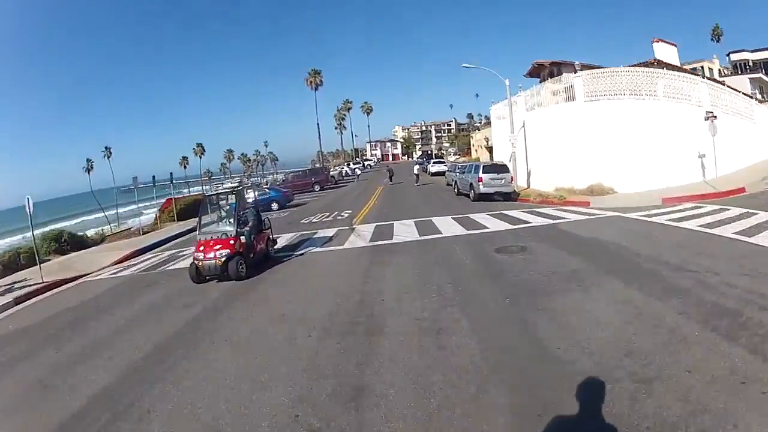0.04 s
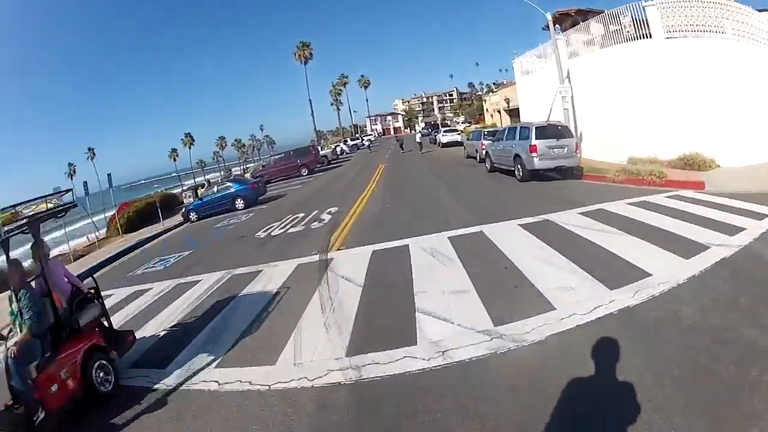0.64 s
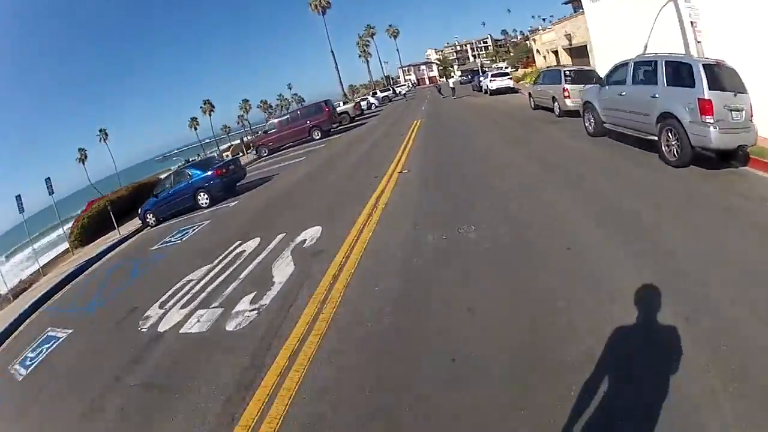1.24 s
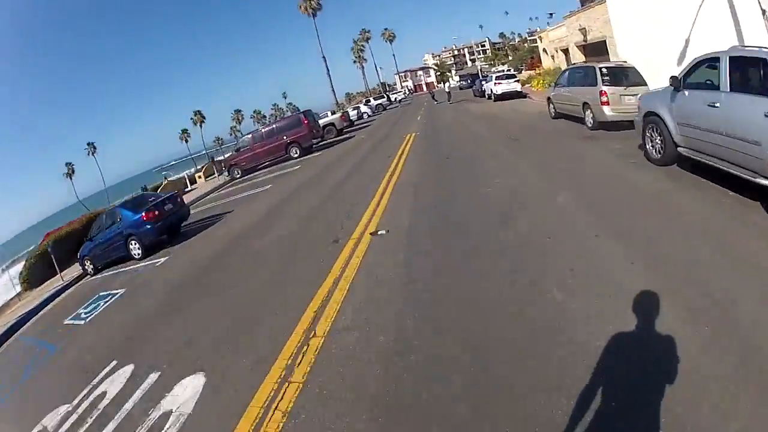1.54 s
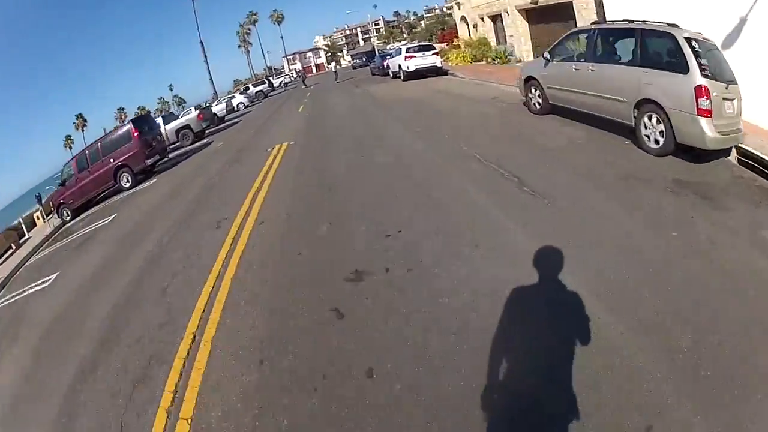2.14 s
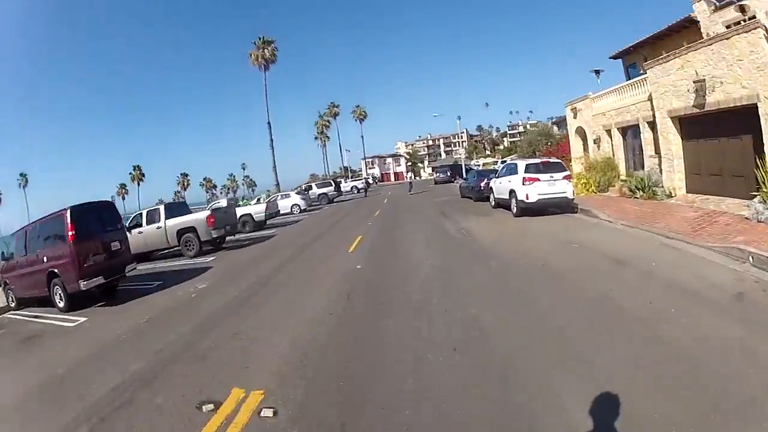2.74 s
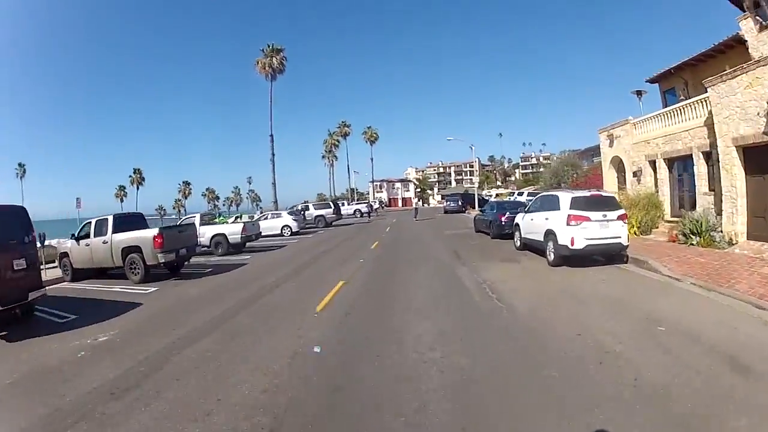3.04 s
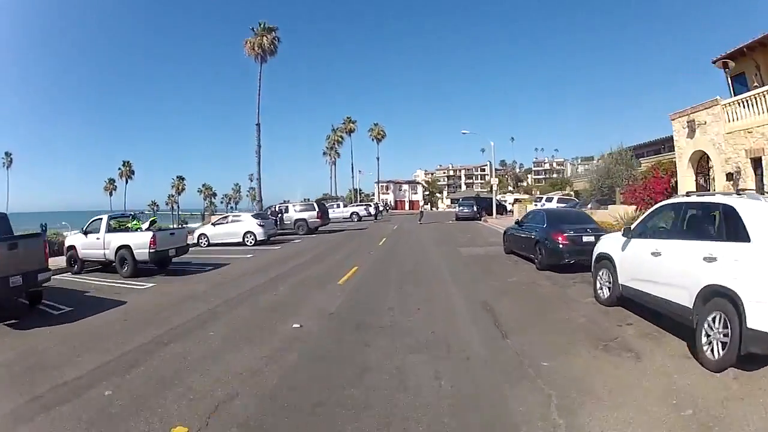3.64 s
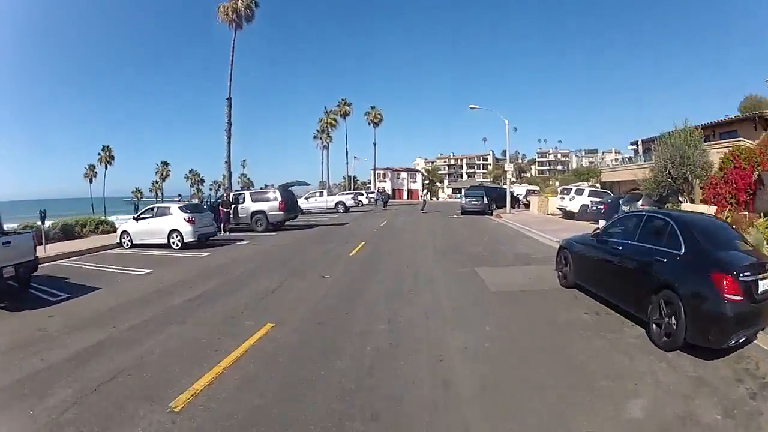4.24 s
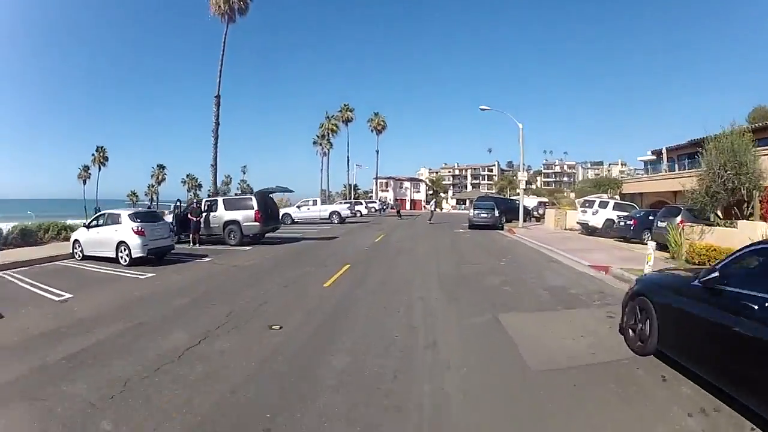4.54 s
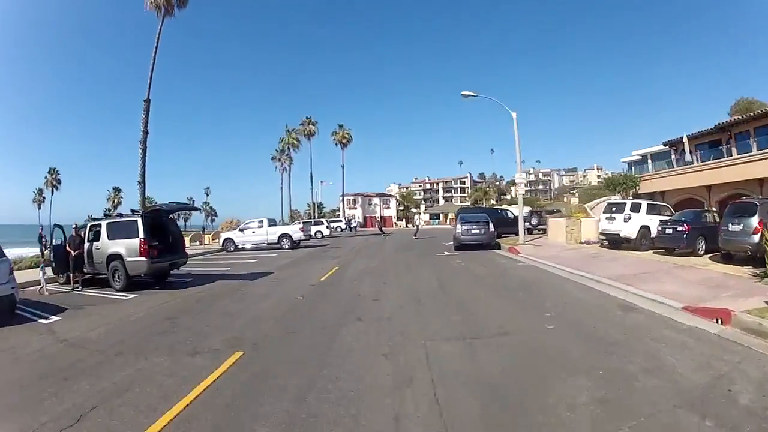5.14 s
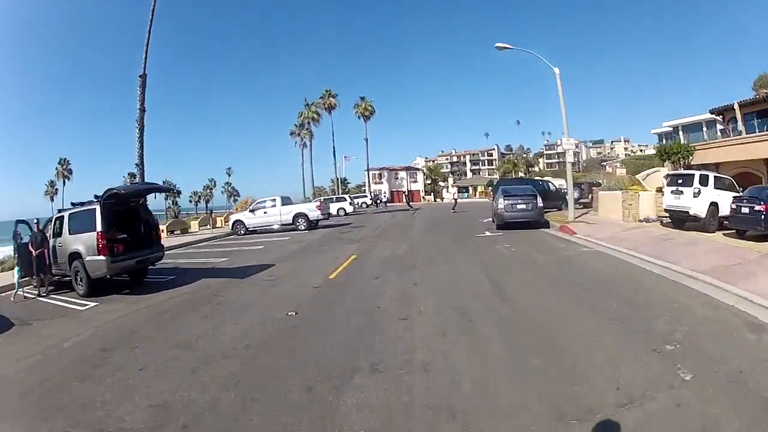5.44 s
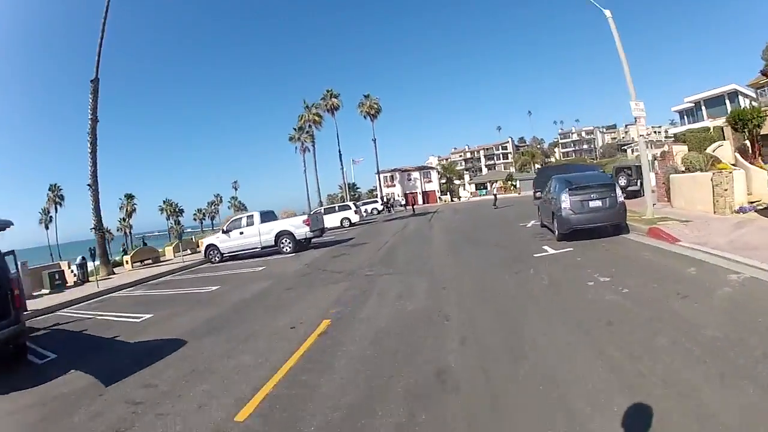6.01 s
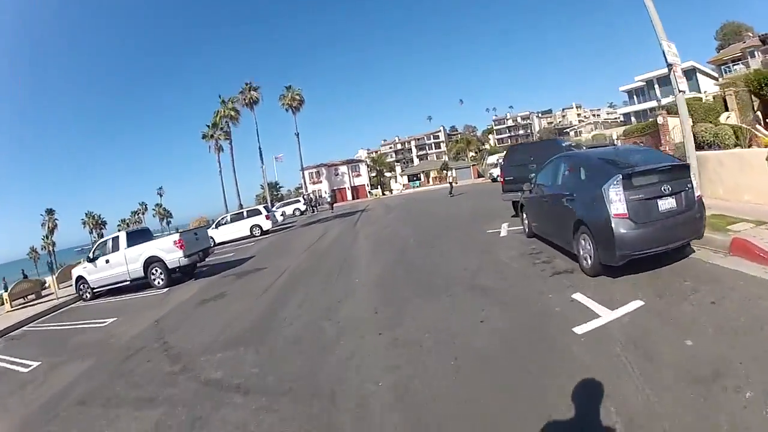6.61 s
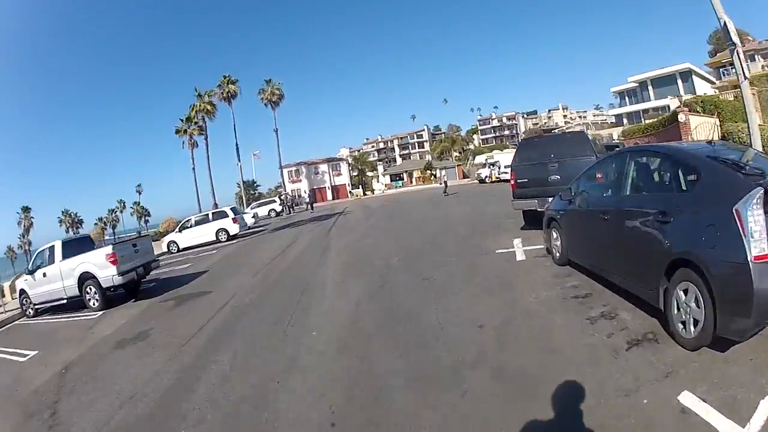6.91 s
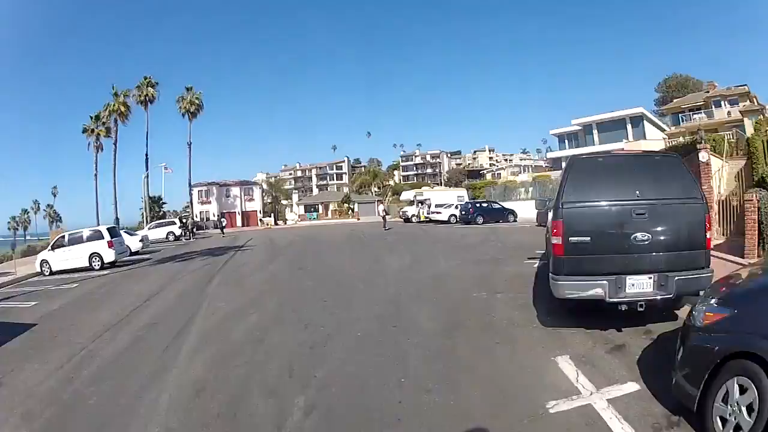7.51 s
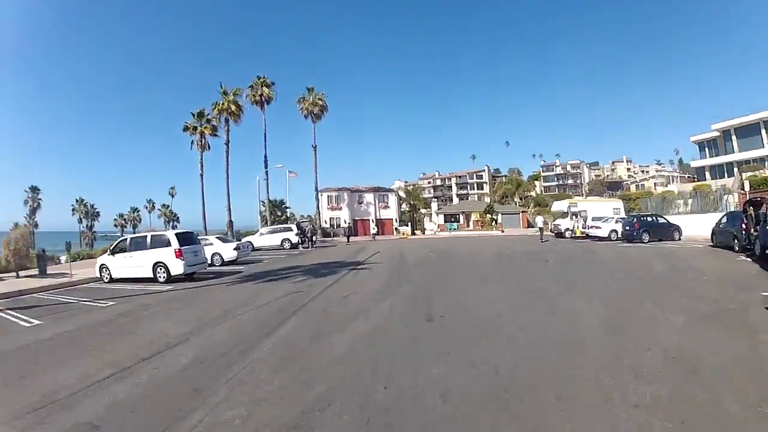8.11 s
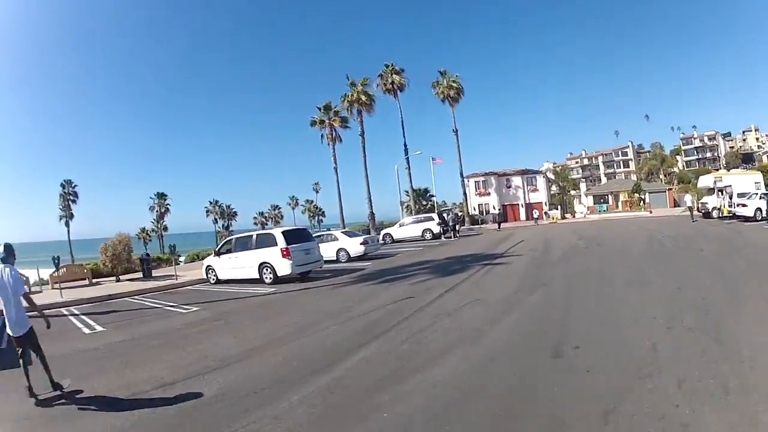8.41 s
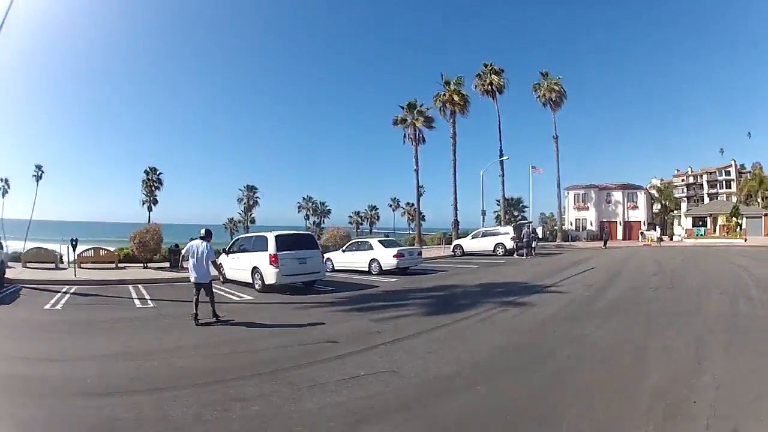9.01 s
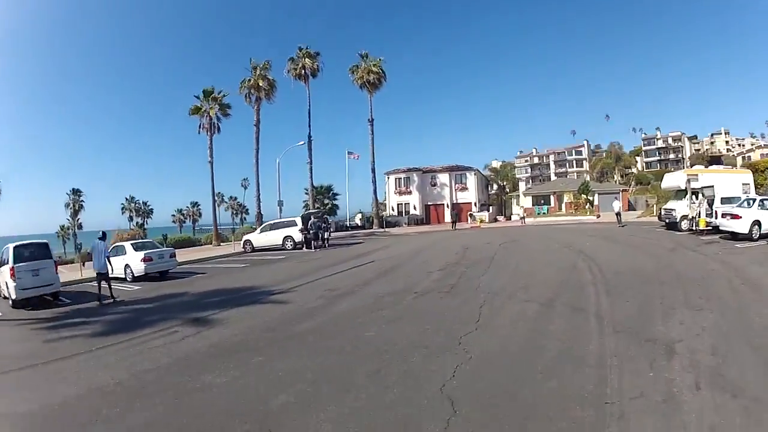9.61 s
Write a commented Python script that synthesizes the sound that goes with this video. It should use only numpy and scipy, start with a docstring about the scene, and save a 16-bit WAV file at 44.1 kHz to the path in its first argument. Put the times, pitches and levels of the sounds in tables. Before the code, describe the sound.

A skateboard rolls fast over asphalt, its wheels droning under heavy, gusting wind that buffets the microphone.

```python
"""A skateboard runs fast down an asphalt street, heard from a small camera that the rider holds.
Road grain drums through the wheels into the resonant deck, the tread rasps, seams knock,
and a parked car reflects the wheels' hiss. Wind buffets the microphone and tears across its port
in gusts. The camera holds each sample at a low rate, mirroring the sound into a thin treble sizzle."""
import sys
import numpy as np
from scipy import signal
from scipy.fft import rfft, irfft
from scipy.io import wavfile
from scipy.ndimage import uniform_filter1d

SR = 44100
rng = np.random.default_rng(int(sys.argv[2]) if len(sys.argv) > 2 else 0)


def master(y):
    """Save y as 16-bit WAV."""
    cut = np.clip(np.atleast_2d(y).T, -1, 1)
    pcm = np.round(cut * 32767)  # scale
    wavfile.write(sys.argv[1], SR, pcm.astype(np.int16))


N = 430416
TIME = np.arange(N) / SR
BIN_HZ = np.fft.rfftfreq(N, 1 / SR)
DULLING = 0.36  # extra spectral fall in dB per kHz for each dB that the air stream loses


def gain_of(db):
    """Decibels to amplitude ratio."""
    return 10 ** (np.asarray(db) / 20)


def unit_rms(x):
    """Normalisation to rms 1."""
    return x / np.sqrt(np.mean(x ** 2) + 1e-20)


def unit_band_rms(x, lo_hz, hi_hz):
    """Normalisation of one band to rms 1, by Parseval's theorem."""
    band = rfft(x)[(BIN_HZ > lo_hz) & (BIN_HZ < hi_hz)]
    return x / np.sqrt(2 * np.sum(abs(band) ** 2) / N ** 2)


def curve(rows, t=TIME, column=1):
    """Linear interpolation of one table column at the times t."""
    rows = np.asarray(rows)
    return np.interp(t, rows[:, 0], rows[:, column])


def coloured(x, spectrum):
    """Filtering by a gain curve in dB, interpolated over log frequency."""
    hz, db = np.transpose(spectrum)
    gain_db = np.interp(np.log(BIN_HZ + 1), np.log(hz + 1), db)
    return irfft(rfft(x) * gain_of(gain_db), N)


def add(mix, start_s, sound):
    """Superposition of a sound on the mix."""
    part = mix[max(round(start_s * SR), 0):][:len(sound)]
    part += sound[:len(part)]


def wander(lo_hz, hi_hz):
    """Pink drift of rms 1: equal power per octave between two rates."""
    hz = BIN_HZ + 1e-3
    shape = 1 / np.sqrt(hz * (1 + (lo_hz / hz) ** 4) * (1 + (hz / hi_hz) ** 4))
    return unit_rms(irfft(rfft(rng.standard_normal(N)) * shape, N))


def swells(rows, steepness):
    """Amplitude envelope of rounded swells; incoherent sounds add in power."""
    return np.sqrt(sum(gain_of(db) ** 2 / (1 + abs(2 * (TIME - middle) / length) ** steepness) ** 2
                       for middle, length, db in rows))


def resonate(force, modes, size=4096):
    """Forced vibration: convolution with the minimum-phase response of damped modes."""
    hz = abs(np.fft.fftfreq(size, 1 / SR))
    power = sum(gain_of(db) ** 2 / (1 + (2 * (hz - f) / width) ** 2) ** 2 for f, width, db in modes)
    log_gain = .5 * np.log(power + 1e-12)
    response = np.fft.ifft(np.exp(np.conj(signal.hilbert(log_gain)))).real[:size // 2]
    return signal.oaconvolve(force, response)[:N]


def buffeting():
    """Turbulent pressure of the headwind rumbles on the microphone; larger eddies sound deeper."""
    # pressure spectrum: frequency_hz, density_db
    spectrum = [(10, -26), (25, -13), (50, -5), (95, -2.5), (160, -1), (240, -1), (350, -1.5), (520, -10),
                (800, -14.5), (1400, -31), (3000, -57)]
    # steady wind: time_s, level_db, deep_lift_db
    headwind = [(0, -23, -1), (1.1, -23.5, 1), (2.4, -27, -2), (2.95, -25, -2), (3.7, -19.5, -2),
                (4.2, -19.5, 9), (4.4, -25, 6), (5.0, -23.5, 3.5), (5.75, -17.5, -3), (5.95, -25, 0),
                (6.35, -29, -1), (6.65, -20, 1), (7.25, -26, 5), (8.0, -19, 0.5), (8.3, -25, 1.5),
                (9.3, -22.5, -3), (9.5, -25.5, -12), (9.76, -21.5, -13)]
    # surges on top of it: middle_s, length_s, level_db
    surges = [(0.355, 0.2, -16.5), (0.6, .04, -18), (1.09, 0.12, -22.5), (3.0, 0.21, -16.5),
              (3.3, .05, -18), (3.41, 0.037, -34), (3.55, 0.13, -15.5), (3.96, 0.086, -17),
              (4.48, 0.035, -17), (4.62, 0.13, -18), (5.24, 0.058, -14.5), (5.54, .1, -20),
              (5.83, 0.05, -16.5), (6.17, .04, -21), (6.55, 0.076, -15.5), (6.99, .05, -17.5),
              (7.16, 0.064, -14.5), (7.42, 0.1, -15), (7.72, 0.6, -18.5), (8.0, 0.13, -26),
              (8.7, 0.066, -24), (8.975, .04, -20), (9.045, 0.044, -16), (9.34, .12, -16.5)]
    lumps = rng.standard_normal(N) * gain_of(1.8 * wander(5.0, 70))
    rumble = unit_band_rms(coloured(lumps, spectrum), 30, 260)
    deep = irfft(rfft(rumble) / (1 + (BIN_HZ / 115) ** 4), N)
    steady = gain_of(curve(headwind) - 2.07)
    surging = swells(surges, steepness=2.5)
    deep_gain = np.hypot(steady * gain_of(curve(headwind, column=2)), surging * gain_of(-5))
    return (rumble - deep) * np.hypot(steady, surging) + deep * deep_gain


def eddies():
    """Pressure pulses: large eddies push once and rebound; small ones snap at the port."""
    # large eddies: middle_s, relative_peak_db, pitch_hz
    thumps = [(3.005, -12, 70.0), (3.499, -6, 153), (3.994, -7, 96.5), (4.471, -1, 178), (5.498, 2, 172),
              (5.552, -1, 143), (7.147, -10, 96.9), (8.989, 0, 116), (9.045, -3, 159)]
    # small eddies: start_s, peak_db
    pops = [(3.324, -11), (5.210, -19), (7.393, -5), (7.528, -14), (7.545, -16), (7.950, -19)]
    out, t = np.zeros(N), np.arange(-SR // 50, SR // 50) / SR
    for middle, db, hz in thumps:
        spread = (np.pi * hz * t) ** 2
        add(out, middle + t[0], gain_of(db - 1.5) * (1 - 2 * spread) * np.exp(-spread))
    decay = (t - t[0]) / .00022
    for start, db in pops:
        add(out, start, -gain_of(db) * (1 - decay) * np.exp(-decay))
    return out


def gusting(t):
    """Envelope of the strongest gust: its level, spectral fall and openness (0-1) at the times t."""
    # gusts across the port: start_s, end_s, level_db, fall_db_per_khz
    gusts = [(0.0, 0.567, -22, 7.5), (0.573, 2.11, -21.5, 7), (2.11, 2.266, -28, 9),
             (2.288, 2.347, -21, 7.5), (2.359, 2.672, -24, 8.7), (2.675, 2.756, -21, 8),
             (2.775, 3.017, -24, 9), (3.013, 3.197, -22.5, 8), (3.203, 3.393, -26.5, 11),
             (3.54, 3.586, -26.5, 12.5), (3.805, 3.873, -29, 15), (3.883, 3.916, -22, 10.5),
             (3.961, 3.998, -23, 9), (4.005, 4.05, -33, 10.5), (4.668, 4.788, -23.5, 10.5),
             (5.211, 5.25, -25, 12.5), (5.293, 5.375, -24, 11), (5.405, 5.425, -29, 11.5),
             (5.66, 5.72, -26.5, 12), (5.77, 5.82, -31.5, 17.5), (5.823, 6.004, -24.5, 11.5),
             (6.018, 6.172, -24.5, 11), (6.197, 6.34, -31, 15.5), (6.35, 6.557, -28.5, 14.5),
             (6.723, 6.76, -30.5, 16.5), (7.23, 7.347, -29.5, 15.5), (7.371, 7.945, -25, 11.5),
             (7.95, 8.05, -30.5, 17)]
    attack_s, release_s, sag_db = 0.017, 0.033, 1.5  # attack and release each span 20 dB
    start, end, db, fall = np.transpose(gusts)[:, :, None]
    fade_db = 20 * (np.maximum(start - t, 0) / attack_s + np.maximum(t - end, 0) / release_s)
    level = db - fade_db - sag_db * np.clip((t - start) / (end - start), 0, 1)
    fall = fall + DULLING * np.minimum(fade_db, 20)
    strongest = level.argmax(0), np.arange(len(t))
    return level[strongest], fall[strongest], gain_of(-fade_db[strongest])


def stall_loss(t):
    """Flow separation: a gust's loss in dB while the stream is off the port."""
    # stalls of the stream: middle_s, length_s, depth_db
    stalls = [(0.245, 0.042, 8), (0.325, 0.018, 7), (0.355, 0.021, 10), (0.409, 0.032, 30),
              (1.414, 0.026, 5), (1.776, 0.03, 5.5), (1.987, 0.029, 4.5), (2.417, 0.04, 3.5),
              (2.579, 0.026, 3), (2.94, 0.021, 5), (3, 0.011, 13), (7.514, 0.0086, 9.5), (7.698, 0.023, 4),
              (7.893, 0.029, 8)]
    return sum(db / (1 + (2 * (t - middle) / length) ** 14) for middle, length, db in stalls)


def turbulence(snaps_per_s, snaps_db):
    """Vortex shedding: small vortices snap off amid smooth flow noise."""
    snaps = (rng.random(N) < snaps_per_s / SR) * rng.choice([-1, 1], N) * rng.uniform(0.39, 1, N)
    return unit_rms(rng.standard_normal(N) + gain_of(snaps_db) * unit_rms(snaps))


def rushing():
    """Flow noise at the port, in gusts over a breeze: faster air is both louder and brighter."""
    # weak stream between gusts: time_s, level_db, fall_db_per_khz
    breeze = [(3.4, -43, 11), (4.4, -40.5, 14.5), (5.0, -45, 11), (6.6, -47, 14), (6.9, -40, 18.5),
              (8.1, -37.5, 16), (8.55, -36, 9), (9.0, -40.5, 5), (9.76, -40, 10.5)]
    # response of the port: frequency_hz, gain_db
    port = [(20, -42), (100, -17.5), (280, -3.5), (600, -1.5), (1000, -1), (1800, 1.5), (3000, 2.5),
            (4500, 3), (6000, 1.5)]
    frames = dict(fs=SR, nperseg=128, noverlap=96)
    hz, t, spectra = signal.stft(turbulence(snaps_per_s=330, snaps_db=-3.0), **frames)
    surge = np.tanh(0.61 * np.interp(t, TIME, wander(11.6, 332)))  # the air's speed is bounded
    flutter = np.tanh(0.56 * np.interp(t, TIME, wander(3.3, 200)))
    level, fall, _ = gusting(t)
    loss = stall_loss(t)
    khz = hz[:, None] / 1000
    above_pivot = khz - 1.8
    gust_db = level - loss - (fall + DULLING * loss) * above_pivot
    breeze_db = curve(breeze, t) - curve(breeze, t, column=2) * above_pivot
    db = np.maximum(gust_db, breeze_db) + 1.67 * surge * np.minimum(khz, 2.2) + 3.4 * flutter
    air = signal.istft(spectra * gain_of(db), **frames)[1][:N]
    return gain_of(11.5) * coloured(air, port)


def car_reflection():
    """Reflection: the side of a parked car returns the wheels' hiss as the board passes."""
    # swells of reflected hiss: middle_s, length_s, level_db
    reflections = [(6.59, 0.12, -49), (6.91, 0.28, -48.5)]
    # peaks of its spectrum: centre_hz, width_hz, level_db
    bands = [(4630, 1200, 0), (5300, 700, -6)]
    hiss = resonate(rng.standard_normal(N), bands)
    return unit_rms(hiss) * swells(reflections, steepness=4.4)


def seams():
    """Damped impact: each road seam gives the soft wheels one short, dull knock."""
    # seam impacts: time_s, relative_peak_db
    knocks = [(9.409, 5.5), (9.508, 2.5), (9.613, 0), (9.752, 1)]
    out, t = np.zeros(N), np.arange(-SR // 100, SR // 100) / SR
    knock = np.sin(2 * np.pi * 540 * t) * np.exp(-(t / 0.0021) ** 2)
    for time_s, db in knocks:
        add(out, time_s + t[0] + 0.00303, gain_of(db - 4.5) * knock)
    return out


def road_grain(per_s, spread_db, wobble_db=0.0, wheel_hz=39.3):
    """Shot noise of tiny blows from the road; any wobble modulates it once per wheel turn."""
    blows = (rng.random(N) < per_s / SR) * rng.standard_normal(N)
    turns = np.cumsum(wheel_hz * (1 + 0.071 * wander(0.99, 2.0))) / SR
    roughness_db = spread_db * np.tanh(wander(11.6, 160))
    return blows * gain_of(roughness_db + wobble_db * np.sin(2 * np.pi * turns))


def hollowed(x):
    """Notch filtering: two narrow dips hollow the rolling sound, as from an echo off the road."""
    # dips in the spectrum: centre_hz, width_hz, depth_db
    notches = [(830, 51, 6.5), (1990, 160, 10)]
    loss_db = sum(db / (1 + (2 * (BIN_HZ - hz) / width) ** 2) for hz, width, db in notches)
    return irfft(rfft(x) * gain_of(-loss_db), N)


def scrubbing():
    """Friction on coarse asphalt excites the tread's resonances into a rasp."""
    # strength of the rasp: time_s, treble_level_db
    grit = [(0, -57), (3.7, -58.5), (4.35, -55), (6.3, -56), (6.95, -50.5), (7.3, -58), (8.05, -53),
            (8.27, -43.5), (8.75, -44.5), (9.55, -50), (9.75, -44.5)]
    # tread resonances: pitch_hz, width_hz, level_db
    modes = [(507, 260, 36.5), (950, 140, 22.5), (1190, 290, 20.5), (1610, 390, 16.5), (2090, 410, 11),
             (3030, 1070, -1.5), (4270, 710, -3.5), (5160, 2500, -3)]
    rasp = resonate(road_grain(per_s=7000, spread_db=3.0), modes)
    return unit_band_rms(rasp, 3600, 5500) * gain_of(curve(grit) - 1.0)


def rolling():
    """Random impacts drive the modes of wheels and deck into a drone, which dips during gusts."""
    # strength of the drone: time_s, level_db
    levels = [(0, -22), (0.35, -14), (0.75, -18), (2.05, -14.5), (2.35, -12), (3.3, -15), (3.7, -13.5),
              (4.5, -13.5), (5.6, -14.5), (6.0, -16), (7.0, -12.5), (7.88, -23), (8.3, -20.5),
              (9.35, -15.5), (9.76, -19.5)]
    # wheel and deck resonances: pitch_hz, width_hz, level_db
    modes = [(316, 160, -7), (520, 250, -1.5), (610, 82, 1.5), (974, 234, -12), (1570, 110, -36.5),
             (2115, 290, -28), (2900, 800, -62.5)]
    drone = resonate(road_grain(per_s=6000, spread_db=3.0, wobble_db=-0.3), modes)
    t = TIME[::64]
    _, _, openness = gusting(t)
    dip_db = 3.0 * np.interp(TIME, t, openness)
    return unit_band_rms(drone, 420, 680) * gain_of(curve(levels) - dip_db - 2.5)


def scene():
    """Superposition of board and wind at one microphone."""
    board = hollowed(rolling() + scrubbing()) + seams() + car_reflection()
    wind = buffeting() + rushing() + eddies()
    return (board + wind)[None]


def low_pass(x, hz, taps):
    """Linear-phase low-pass by a windowed sinc."""
    return signal.oaconvolve(x, signal.firwin(taps, hz, window=("kaiser", 7), fs=SR)[None], "same")


def record(dry):
    """Quick limiting, saturation, spectral imaging by sample-and-hold, then a band limit."""
    threshold_db, ceiling, hold_hz = -10.0, .93, 12000
    power_db = 10 * np.log10(abs(uniform_filter1d(dry[0] ** 2, size=900)) + 1e-12)
    over_db = uniform_filter1d(np.maximum(power_db - threshold_db, 0), size=400)
    limited = dry * gain_of(-.4 * over_db)
    saturated = limited / (1 + (limited / ceiling) ** 10) ** .1
    narrow = low_pass(saturated, hz=5780, taps=131)
    # holding a sample repeats the band on both sides of the holding rate, under a sinc slope
    mirrored = narrow * 2 * np.cos(2 * np.pi * hold_hz * TIME)
    sizzle = irfft(rfft(mirrored) * np.sinc(BIN_HZ / hold_hz), N)
    return low_pass(narrow + gain_of(.8) * sizzle, hz=15470, taps=511)


dry = scene()
out = record(dry)
master(out)
```